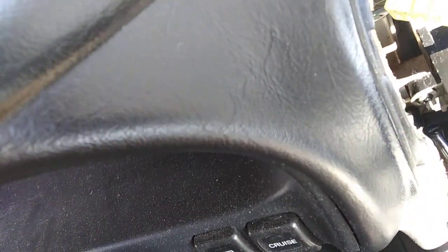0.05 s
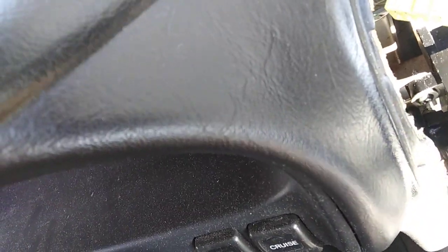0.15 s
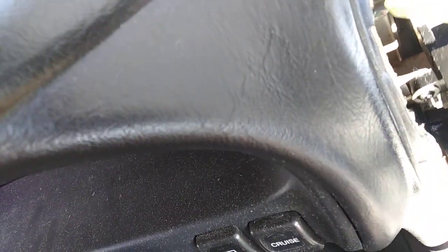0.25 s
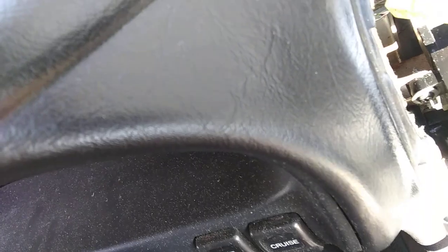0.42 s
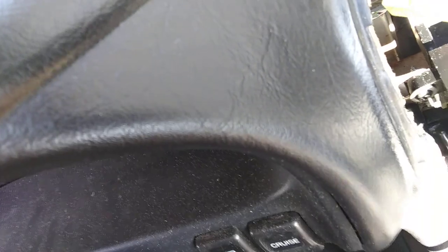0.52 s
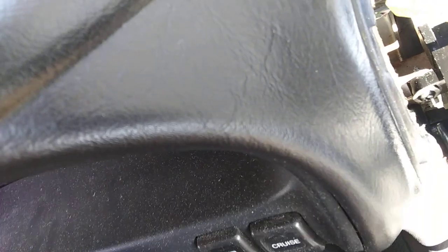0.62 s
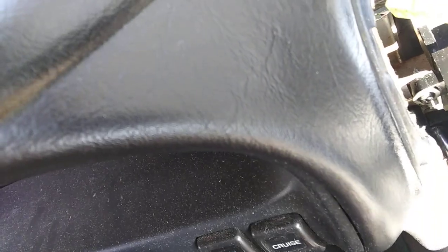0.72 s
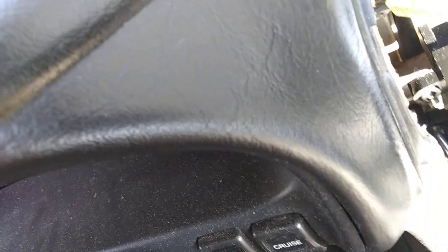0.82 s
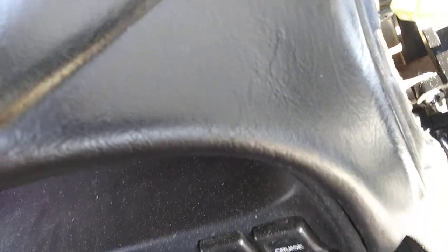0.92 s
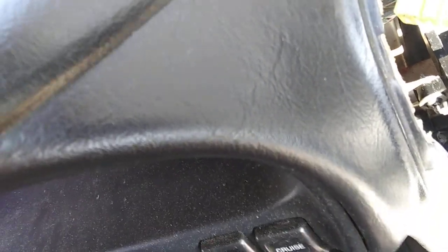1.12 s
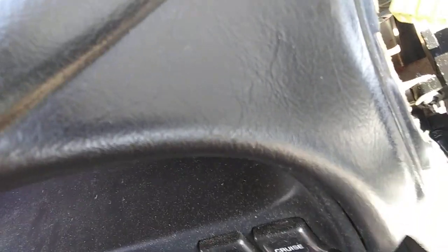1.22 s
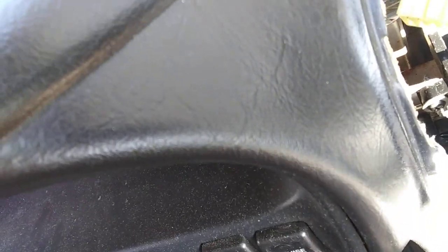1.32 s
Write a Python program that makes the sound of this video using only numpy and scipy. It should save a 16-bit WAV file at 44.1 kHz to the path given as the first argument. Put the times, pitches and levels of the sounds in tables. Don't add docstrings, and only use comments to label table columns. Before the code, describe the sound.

Steel locking forceps click and knock irregularly against a screw behind plastic car dash trim, up close

```python
import sys
import numpy as np
from scipy import signal
from scipy.fft import rfft, irfft
from scipy.io import wavfile
from scipy.ndimage import uniform_filter1d

SR = 44100
rng = np.random.default_rng(int(sys.argv[2]) if len(sys.argv) > 2 else 0)


def gain_from_db(level_db):
    decades = np.asarray(level_db, float) / 20
    return 10 ** decades


def int16_out(signal):
    q = np.round(np.clip(np.atleast_2d(signal).T, -1, 1) * 32767)
    wavfile.write(sys.argv[1], SR, q.astype(np.int16))


N = 59535
RING = 6000


def unit(x):
    return x / np.sqrt(np.mean(x ** 2))


def fade(t60):
    return np.exp(-np.log(1000) * np.arange(RING) / SR / t60)


def add(out, s, x):
    i = int(s * SR)
    out[i:i + len(x)] += x[:N - i]


# f/Hz, level/dB (per Hz)
HISS_COLOUR = [(18, -45), (30, -22.5), (81, -17.5), (381, -3.5), (677, -6), (793, 0.5), (904, -2.5),
               (4470, -9.5), (15700, -17.5)]
HISS_DB, HISS_WANDER_DB = -67.5, 0.6


def hiss():
    hz = np.maximum(np.fft.rfftfreq(N, 1 / SR), 1)
    colour_hz, colour_db = np.array(HISS_COLOUR).T
    colour = gain_from_db(np.interp(np.log(hz), np.log(colour_hz), colour_db))
    slow = uniform_filter1d(rng.standard_normal(N), size=2000)
    wander = unit(uniform_filter1d(slow, size=2000))
    noise = unit(irfft(rfft(rng.standard_normal(N)) * colour, N))
    return noise * gain_from_db(HISS_DB + HISS_WANDER_DB * wander)


CABIN_DB, CABIN_T60_S, CABIN_HZ = -12, 0.061, 3700


def cabin_tail(dry):
    noise = signal.lfilter(*signal.butter(1, CABIN_HZ, fs=SR), rng.standard_normal(RING))
    tail = noise * fade(CABIN_T60_S)
    late = np.arange(RING) > 60
    tail = tail * late / np.sqrt(np.sum(tail ** 2))
    return gain_from_db(CABIN_DB) * signal.fftconvolve(dry, tail)[:N]


CROWD_DB, CROWD_SPREAD, CROWD_HZ, CROWD_DAMP = -10, .06, 60, .7
RISE_CYCLES = 1.2


def mode_bank(modes, count=9):
    hz, db, t60 = np.repeat(np.array(modes), count, axis=0).T[:, :, None]
    half = count // 2
    place = (np.arange(len(hz)) % count - half)[:, None]
    near = place != 0
    t = np.arange(RING) / SR
    offset = (place + rng.uniform(-.5, .5, hz.shape)) / half
    hz = hz + near * (CROWD_SPREAD * hz + CROWD_HZ) * offset
    rise = 1 - np.exp(-t * hz / RISE_CYCLES)
    shape = fade(t60 * np.where(near, CROWD_DAMP, 1)) * rise
    sines = np.sin(2 * np.pi * np.minimum(hz, .45 * SR) * t)
    return hz[:, 0], gain_from_db(db + near * CROWD_DB) * sines * shape


SPOT_DB = 1.5


def ring(bank, tilt_db=0):
    hz, sines = bank
    spot, sign = rng.standard_normal((2, len(hz)))
    levels = gain_from_db(SPOT_DB * spot + tilt_db * np.log2(hz)) * np.sign(sign)
    return unit(levels @ sines) * np.sqrt(SR / 200 / RING)


REBOUND = .3


def chatter(length_ms):
    ms = np.arange(1200) * 1000 / SR
    rebounds = rng.standard_normal(len(ms)) * (rng.random(len(ms)) < .1)
    clicks = REBOUND * rebounds / np.sqrt(1 + length_ms)
    clicks[0] = 1
    push = clicks * np.exp(-(ms / max(length_ms, .05)) ** 2)
    return push / np.sqrt(np.sum(push ** 2))


# f/Hz, level/dB, t60/s
PANEL_MODES = [(140, -17, .1), (205, -10, .09), (270, -12, .08), (345, -4, .08), (460, -4, .07),
               (556, 0, .07)]
# t/s, level/dB, push/ms
PANEL_THUDS = [(.218, -44.5, 5.5), (.375, -67, 5.3), (.58, -51, 4.5), (.645, -58, 13), (.76, -43.5, 1.7),
               (0.847, -43, 6.8), (0.887, -59, 6.3), (1.09, -49.5, 13), (1.139, -59, 4.2), (1.185, -64, 8),
               (1.202, -48.5, 9.5), (1.229, -46.5, 23), (1.252, -48.5, 7), (1.271, -55, 8.2)]


def thuds():
    out, bank = np.zeros(N), mode_bank(PANEL_MODES)
    for s, db, push_ms in PANEL_THUDS:
        add(out, s, gain_from_db(db) * signal.fftconvolve(chatter(push_ms), ring(bank)))
    return out


# f/Hz, level/dB, t60/s
JAW_MODES = [(4566, -1, .028), (4899, -4, .028), (5110, -4, .028), (5374, -1, .03), (5770, -6, .03),
             (5992, -2, .042), (6318, -3, .028), (6750, -6, .026), (7300, -7, .024), (7900, -9, .022),
             (8800, -15, .018), (10000, -20, .018), (11800, -25, .018), (14000, -30, .016)]
# f/Hz, level/dB, t60/s
BRACKET_MODES = [(1598, -10, .04), (1810, -15, .04), (2049, -12, .045), (2190, -18, .04), (2460, -5, .045),
                 (2720, -22, .04), (2986, -5, .04), (3290, -2, .035), (3560, 0, .03), (3680, -2, .03),
                 (3941, -4, .03), (4102, -1, .03), (4300, -5, .03)]
# f/Hz, level/dB, t60/s
TRIM_MODES = [(620, -11, .05), (700, -7, .05), (792, 0, .065), (900, -10, .045), (1060, -5, .05),
              (1190, -4, .04), (1250, -3, .04), (1370, -10, .035), (1500, -13, .035)]


def struck_parts():
    return [mode_bank(modes) for modes in (JAW_MODES, BRACKET_MODES, TRIM_MODES)]


CRACK_T60_S, CRACK_LOW_HZ, CRACK_TOP_HZ = 0.021, 5540, 12000


def contact(banks, push, jaws_db, bracket_db, trim_db, tilt_db, crack_db):
    band = signal.butter(1, [CRACK_LOW_HZ, CRACK_TOP_HZ], "band", fs=SR, output="sos")
    crack = signal.sosfilt(band, rng.standard_normal(RING)) * fade(CRACK_T60_S)
    jaws = gain_from_db(jaws_db) * (ring(banks[0]) + gain_from_db(crack_db) * crack)
    bracket = gain_from_db(bracket_db) * ring(banks[1], tilt_db)
    trim = gain_from_db(trim_db) * ring(banks[2])
    return signal.fftconvolve(push, jaws + bracket + trim)


# t/s, length/s, jaws level/dB, bracket level/dB, trim level/dB
JAW_SCRAPES = [(0.179, 0.085, -56, -56.5, -58), (0.315, 0.04, -61.5, -63.5, -68),
               (0.36, 0.012, -60, -90, -61), (.50, 0.12, -61.5, -62, -67.5),
               (0.631, 0.029, -54.5, -55.5, -51.5), (0.736, 0.031, -71, -59.5, -57),
               (0.825, 0.024, -67, -58.5, -53), (0.862, 0.085, -82, -78.5, -71),
               (1.084, 0.047, -76.5, -62, -74), (1.197, 0.024, -66, -60, -50.5),
               (1.232, 0.041, -64, -61.5, -53.5)]
CLICKS_PER_S, CLICK_SPREAD_DB = 2500, 2


def scrapes(banks):
    out = np.zeros(N)
    for s, length, jaws_db, bracket_db, trim_db in JAW_SCRAPES:
        u = np.arange(4410) / SR / length
        slips = rng.random(len(u)) < CLICKS_PER_S / SR
        sizes = gain_from_db(CLICK_SPREAD_DB * rng.exponential(size=len(u)))
        clicks = slips * sizes * rng.choice([-1, 1], len(u))
        swell = np.sin(np.pi * np.clip(u, 0, 1) ** 1.1) ** 0.78
        push = unit(clicks) * swell * np.sqrt(200 / SR)
        add(out, s, contact(banks, push, jaws_db, bracket_db, trim_db, tilt_db=-7, crack_db=-12))
    return out


# t/s, jaws level/dB, bracket level/dB, trim level/dB, chatter/ms
JAW_TICKS = [(.1392, -52, -91, -97, .6), (0.1672, -50.5, -70, -92, 1.1), (0.1724, -50.5, -57.5, -87, 0.53),
             (0.201, -63.5, -62, -51.5, 0.75), (0.2745, -40.5, -46, -60.5, 0.31),
             (0.5453, -44, -48, -59, 1.1), (0.5686, -51.5, -82, -89, .6), (0.575, -54, -49, -53, 0.71),
             (0.6359, -47.5, -53, -70, 0.36), (0.6456, -49.5, -51, -63, 4.5), (.9025, -63, -75, -58, 4.4),
             (1.084, -69, -68, -71, 1.3), (1.112, -54, -61.5, -63, 0.93), (1.1735, -65, -78, -76, 0.66)]


def ticks(banks):
    out = np.zeros(N)
    for s, jaws_db, bracket_db, trim_db, chatter_ms in JAW_TICKS:
        push = chatter(chatter_ms)
        add(out, s, contact(banks, push, jaws_db, bracket_db, trim_db, tilt_db=0, crack_db=0.5))
    return out


# t/s, jaws level/dB, bracket level/dB, trim level/dB, hardness/(dB per octave)
JAW_KNOCKS = [(0.218, -19.5, -15.5, -28, 7.5), (0.2277, -44, -39, -55, -3), (0.3428, -63, -48, -51, -21.5),
              (0.374, -65, -50.5, -59, -14.5), (.379, -65, -55, -56, -15),
              (0.5798, -41.5, -24, -34.5, -5.5), (0.76, -41, -39, -36, -20.5),
              (0.8432, -43.5, -52.5, -45.5, 15), (0.8451, -37, -50.5, -44, 0),
              (0.8471, -29, -30, -42.5, -10.5), (0.8498, -41.5, -40, -43, -9),
              (.984, -89, -67, -66.5, -10.5), (1.091, -68, -61.5, -53, -17),
              (1.1375, -73, -70.5, -53.5, 0.5), (1.184, -79, -70, -57, -6), (1.2026, -71, -54.5, -59, -18),
              (1.2264, -35, -36.5, -43.5, -8), (1.2725, -58, -41, -49, -14)]


def knocks(banks):
    out = np.zeros(N)
    for s, jaws_db, bracket_db, trim_db, tilt_db in JAW_KNOCKS:
        push = chatter(2.2)
        add(out, s, contact(banks, push, jaws_db, bracket_db, trim_db, tilt_db, crack_db=-8))
    return out


BASS_HZ = 156.6


def scene():
    banks = struck_parts()
    dry = ticks(banks) + knocks(banks) + scrapes(banks) + thuds()
    dry = signal.sosfilt(signal.butter(3, BASS_HZ, "high", fs=SR, output="sos"), dry)
    return (dry + cabin_tail(dry) + hiss())[None]


TOP_HZ = 15800


def top_cut(x):
    return signal.sosfilt(signal.butter(12, 16610, fs=SR, output="sos"), x)


def record(dry):
    low_pass = signal.ellip(8, .2, 60, TOP_HZ, fs=SR, output="sos")
    return top_cut(signal.sosfilt(low_pass, dry))


dry = scene()
out = record(dry)
int16_out(out)
```